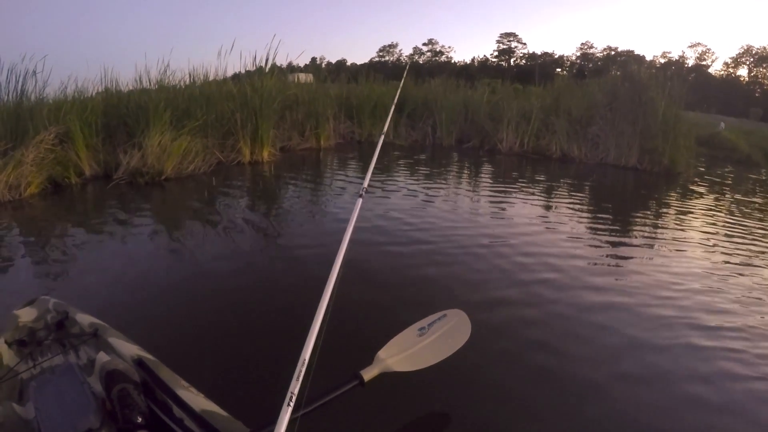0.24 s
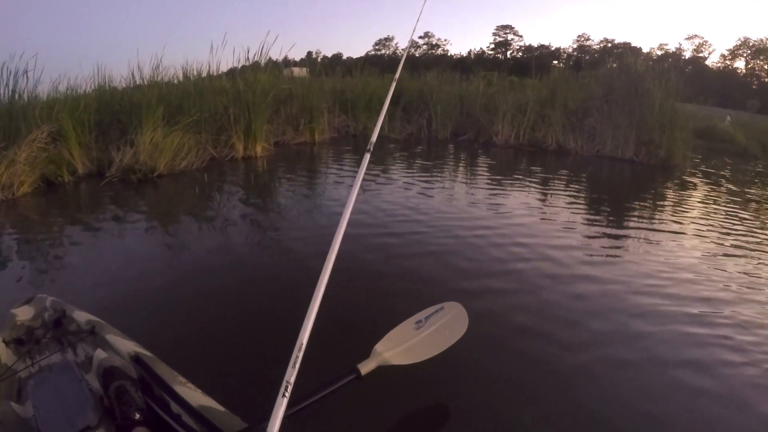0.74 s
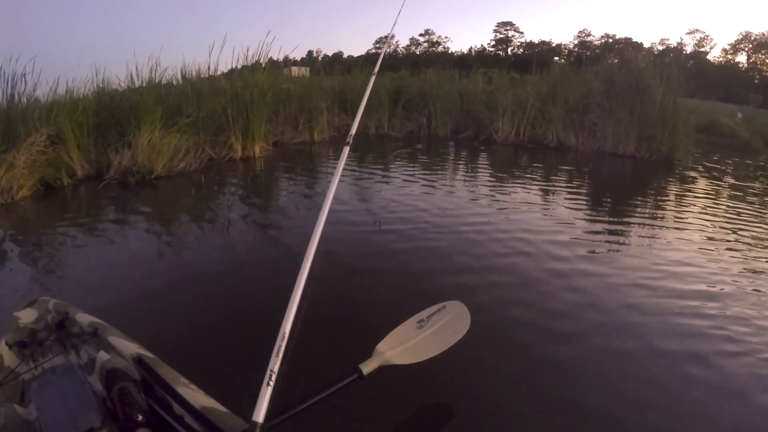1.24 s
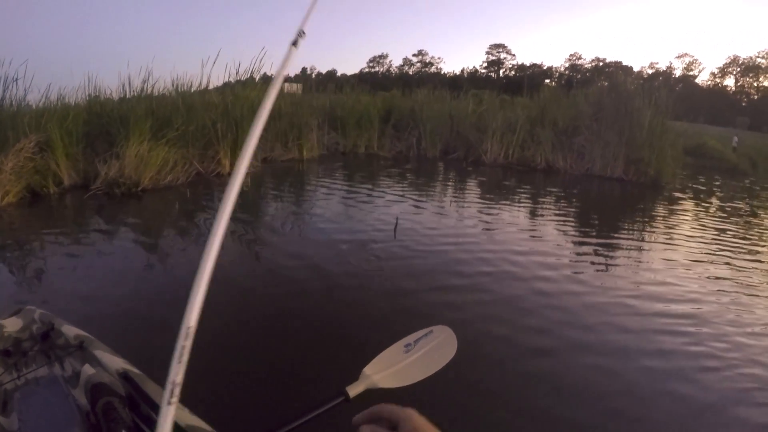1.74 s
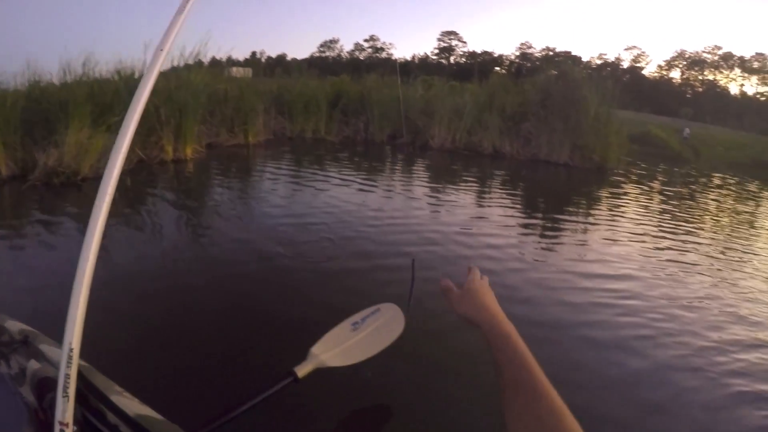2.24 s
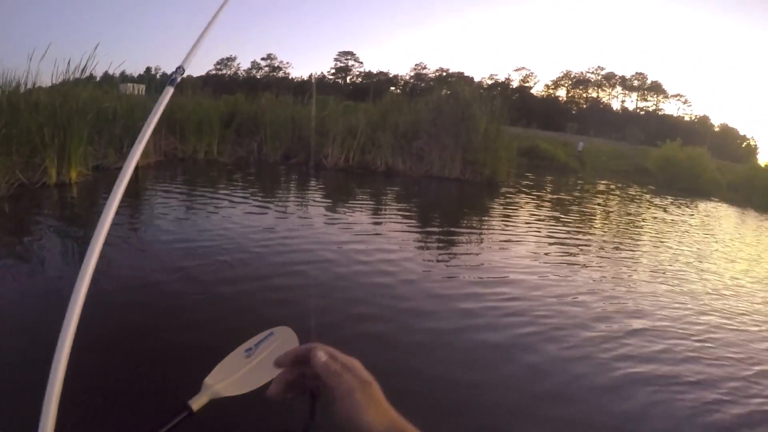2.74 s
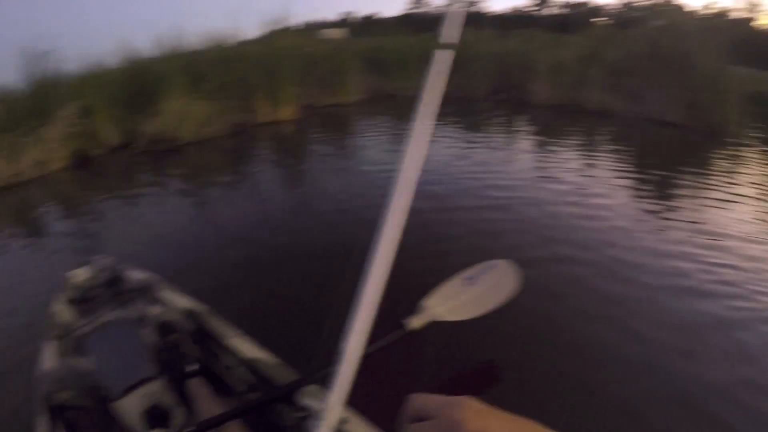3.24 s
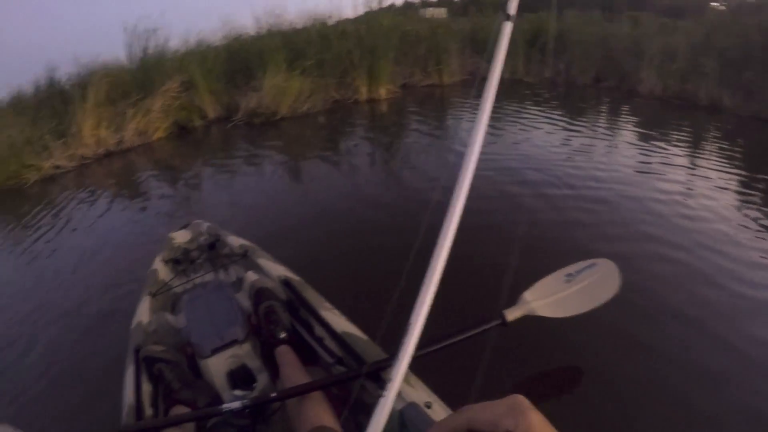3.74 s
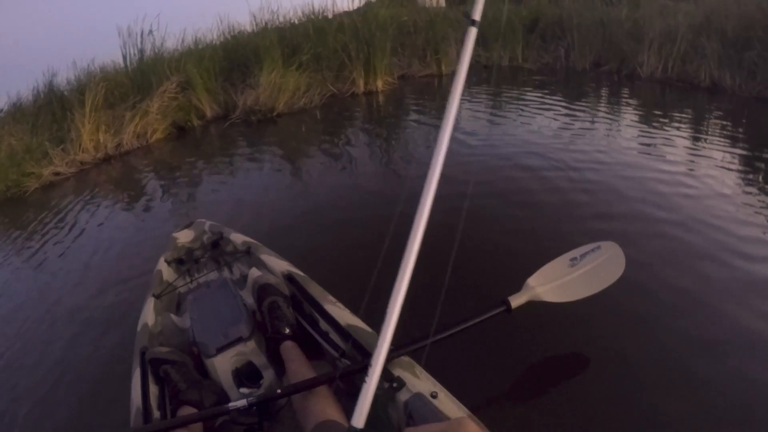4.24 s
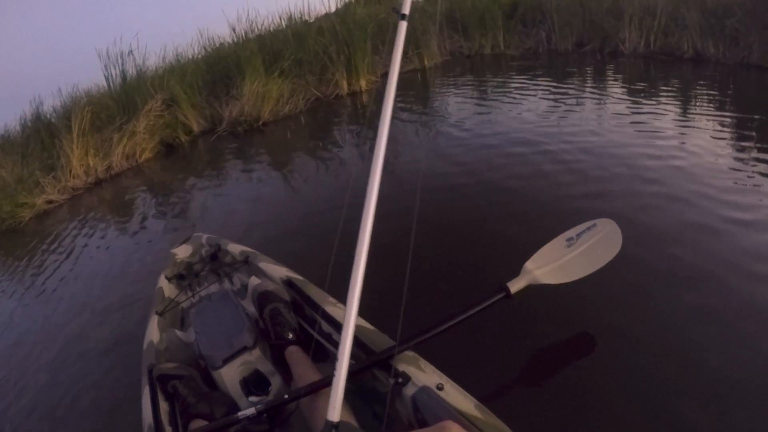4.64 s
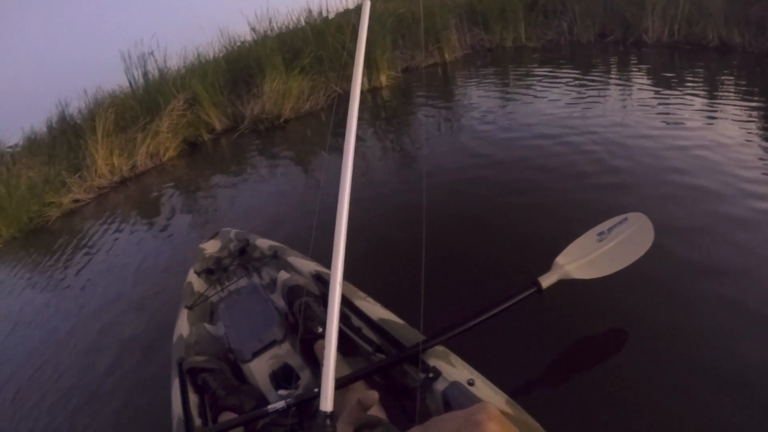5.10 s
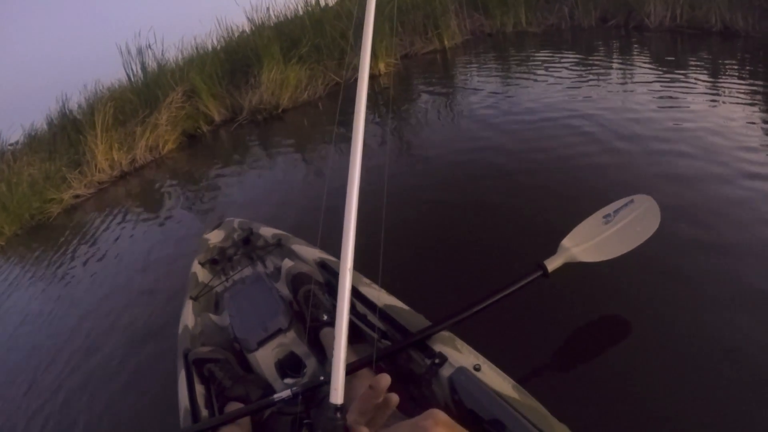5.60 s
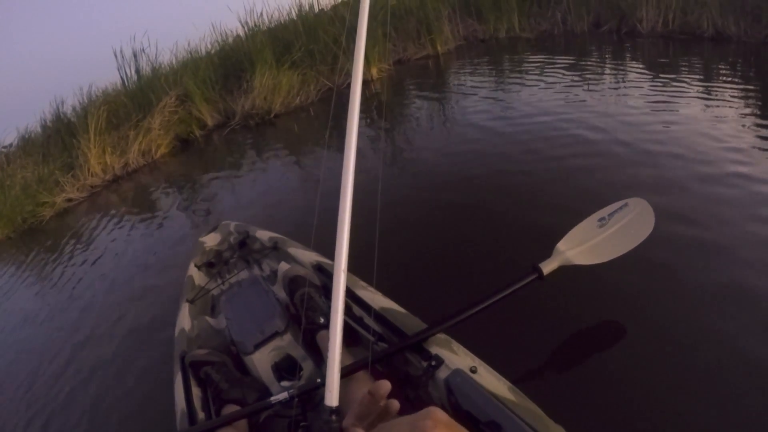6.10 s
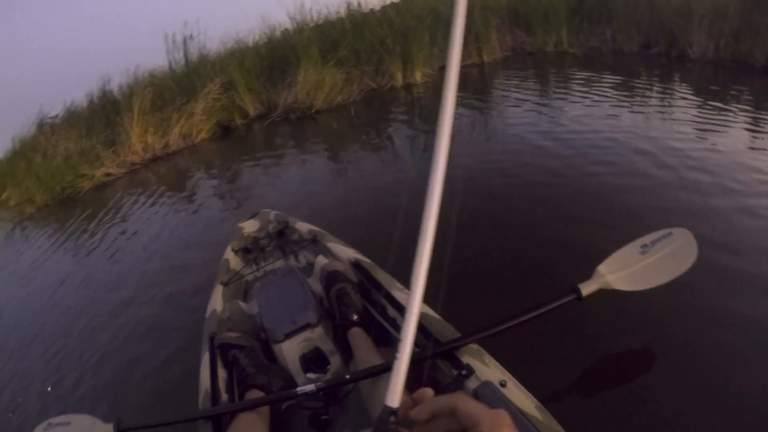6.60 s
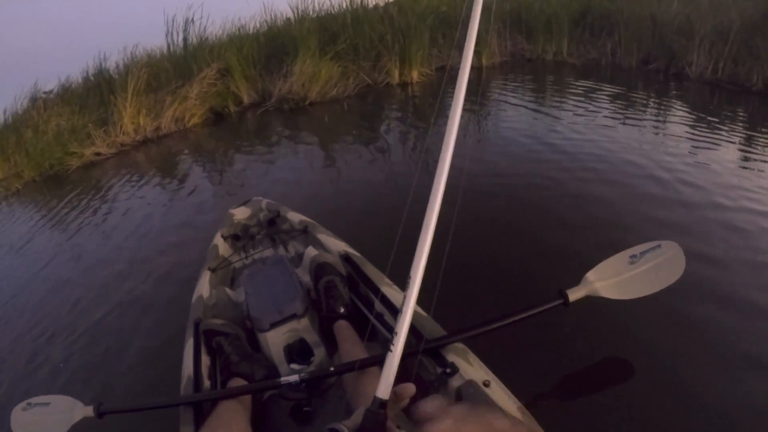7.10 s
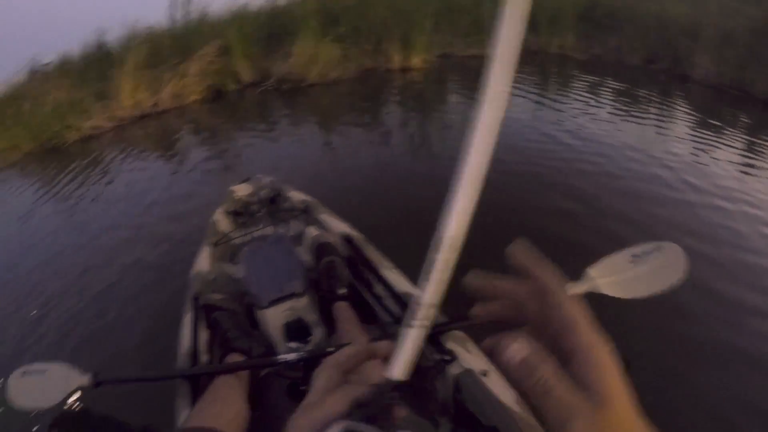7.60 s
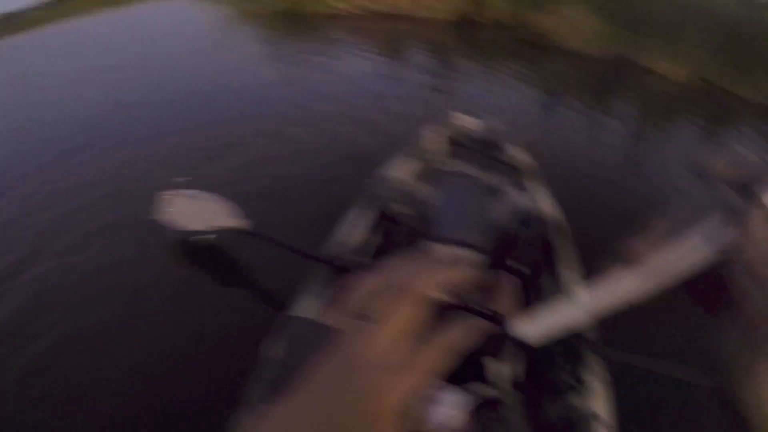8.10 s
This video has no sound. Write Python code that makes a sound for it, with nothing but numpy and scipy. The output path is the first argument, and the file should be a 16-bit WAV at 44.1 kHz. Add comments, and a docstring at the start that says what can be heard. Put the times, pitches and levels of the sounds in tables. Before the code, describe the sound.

Six rapid, fluttering bird buzzes fill the first half, alternating with tiny descending chips; later only chips and thin sliding whistles remain. A far, steady insect hum and open-air hush lie beneath, with deep soft gusts on the microphone. Small cloth rubs and dull hull knocks come from close by. A weak tackle click is followed much later by one bright, hard, dry snap, then brief rustling.

```python
"""Quiet marsh from a kayak at dusk

A bird repeats a buzzy trill (rapid pitch flicks); others chip, whistle and slur (gliding tones) from the reeds.
Behind them lie a thin, far insect drone (throbbing noise bands) and the hush of open air (shaped noise).
Light wind rumbles on the microphone (low noise following the breeze); the angler's clothes rustle in noise
grains, gear ticks on the hull, and the fishing tackle clicks twice, once sharply (ringing modes and a crack).
"""
import sys
import numpy as np
from scipy import signal
from scipy.fft import rfft, irfft
from scipy.io import wavfile
from scipy.ndimage import uniform_filter1d

SR = 44100
rng = np.random.default_rng(int(sys.argv[2]) if len(sys.argv) > 2 else 0)


def store_pcm(level_fs):
    """Save levels as 16-bit WAV."""
    pcm = np.round(np.clip(level_fs, -1, 1) * 32767).astype(np.int16)
    wavfile.write(sys.argv[1], SR, np.atleast_2d(pcm).T)


N = 368235
TIME = np.arange(N) / SR


def amp(db):
    """Decibels to gain."""
    return 10 ** (np.asarray(db) / 20)


def unit(x):
    """Scales to rms 1."""
    return x / np.sqrt(np.mean(x ** 2) + 1e-20)


def add(mix, s, sound):
    """Mixes a sound in at time s, trimming whatever falls outside the mix."""
    at = round(s * SR)
    sound = sound[max(-at, 0):]
    part = mix[max(at, 0):][:len(sound)]
    part += sound[:len(part)]


def colour(x, points):
    """Filters x through a curve of (f/Hz, level/dB) points and scales it to rms 1."""
    hz, db = np.transpose(points)
    f = np.fft.rfftfreq(len(x), 1 / SR)
    gain = amp(np.interp(np.log(f + 1), np.log(hz), db))
    return unit(irfft(rfft(x) * gain, len(x)))


def drift(size, rate):
    """Smooth random wander of rms 1; its spectrum rolls off around rate in Hz."""
    f = np.fft.rfftfreq(size, 1 / SR)
    spectrum = rfft(rng.standard_normal(size)) * np.exp(-(f / rate) ** 2)
    return unit(irfft(spectrum, size))


def course(length):
    """Runs from 0 to 1 over a length in seconds."""
    return np.linspace(0, 1, int(length * SR))


def phase(hz):
    """Running phase of a frequency curve."""
    return 2 * np.pi * np.cumsum(hz) / SR


def echo(x, delay, db):
    """Adds one late copy."""
    t = np.arange(len(x)) / SR
    return x + amp(db) * np.interp(t - delay, t, x, left=0)


def reeds(x, wet_db, t60):
    """The reed bank scatters a sound into many late copies that die away over t60 seconds."""
    t = np.arange(SR // 2) / SR
    sparse = rng.standard_normal(len(t)) * (rng.random(len(t)) < .1)
    taps = sparse * (t > .003) * amp(-60 * t / t60)
    scattered = signal.fftconvolve(x, taps / np.linalg.norm(taps))[:len(x)]
    return x + amp(wet_db) * scattered


# tone of the still air over the marsh: f/Hz, relative level per Hz/dB
AIR_COLOUR = [(30, 8.5), (120, 9.5), (220, 4.5), (400, -1), (800, -4.5), (1200, -6), (2800, -6.5),
              (4300, -8), (5800, -10), (6600, -13.5), (9500, -16.5), (15000, -20.5)]


def air(level_db=-61.5, swell_db=1.0):
    """The smooth hush of the open marsh: shaped noise with a small random swell."""
    return colour(rng.standard_normal(N), AIR_COLOUR) * amp(level_db + swell_db * drift(N, 5.5))


# strength of the breeze at the microphone: t/s, buffeting level/dB, flutter level before its trim/dB
BREEZE = [(0, -54, -60.5), (0.45, -56, -62.5), (1.0, -49, -57.5), (1.35, -52.5, -61), (1.65, -48.5, -57),
          (2.0, -55, -57), (2.55, -50, -56), (3.3, -45.5, -58.5), (3.65, -53.5, -57), (4.6, -54, -62),
          (5.05, -50.5, -58), (5.55, -47.5, -52), (6.3, -48.5, -52.5), (6.8, -55.5, -59.5), (7.2, -54, -58),
          (7.85, -50, -59), (8.35, -45, -50)]
# single gusts that thump the microphone: t/s, buffeting change/dB, flutter change/dB
GUSTS = [(.7, -1, 12.5), (1.01, -2, 13), (1.21, 9.5, 7), (1.58, -2, 12), (2.54, 12, -16), (3.19, 8.5, 6),
         (7.37, 8, 8.5), (7.88, 10.5, 1), (8.22, 3, -8)]
GUST_S = 0.042  # time from the peak of a gust to 1/e of its dB change


def eddies(shape, breeze_db, gusts_db, lumpy_db, lumps_per_s=6):
    """Turbulence of one size: it follows the breeze, jumps at each gust and is lumpy in between."""
    db = np.interp(TIME, np.transpose(BREEZE)[0], breeze_db) + lumpy_db * drift(N, lumps_per_s)
    for s, extra_db in zip(np.transpose(GUSTS)[0], gusts_db):
        db = db + extra_db * np.exp(-((TIME - s) / GUST_S) ** 2)
    swirl = colour(rng.standard_normal(N), shape)
    # even out the noise's own swells, so that the level follows the curve
    local_rms = np.sqrt(uniform_filter1d(swirl ** 2, size=6000))
    return swirl / local_rms * amp(db)


# tone of the deep buffeting: f/Hz, relative level per Hz/dB
BUFFET_COLOUR = [(8, -15), (20, -2), (30, 5), (48, -7.5), (62, -14), (120, -47), (1000, -120)]
# tone of the quicker flutter: f/Hz, relative level per Hz/dB
FLUTTER_COLOUR = [(35, -23.5), (58, 0.5), (76, -1), (100, -11), (140, -28.5), (250, -38.5), (600, -54),
                  (3000, -110)]


def wind(flutter_trim_db=0.56):
    """Large slow eddies and small quick ones hit the microphone."""
    _, deep, quick = np.transpose(BREEZE)
    _, deep_gusts, quick_gusts = np.transpose(GUSTS)
    buffeting = eddies(BUFFET_COLOUR, deep, deep_gusts, lumpy_db=2)
    flutter = eddies(FLUTTER_COLOUR, quick + flutter_trim_db, quick_gusts, lumpy_db=2)
    return buffeting + flutter


# insect choirs: centre f/Hz, width/Hz, level before the swell/dB, mean throb rate/Hz
INSECTS = [(5240, 238, -81, 59), (4868, 200, -83.5, 34)]
# common swell of the choirs: t/s, added level/dB
CHOIR_SWELL = [(0, 2), (1.2, 4), (2.5, 1), (4, 4), (5.3, 4.5), (6.5, 6.5), (7.4, 6), (8.35, 3)]


def insects(throb=0.299, swell_db=1):
    """Many far insects blur into narrow, faintly throbbing bands of noise."""
    out, f = np.zeros(N), np.fft.rfftfreq(N, 1 / SR)
    for hz, width, db, rate in INSECTS:
        bell = np.exp(-2 * ((f - hz) / width) ** 2)
        band = unit(irfft(rfft(rng.standard_normal(N)) * bell, N))
        pulse = 1 + throb * np.sin(phase(rate * (1 + 0.0676 * drift(N, 3.6))))
        out += band * pulse * amp(db + swell_db * drift(N, 12.0))
    return out * amp(np.interp(TIME, *np.transpose(CHOIR_SWELL)))


# course of a trill: share of its length, level change/dB, pitch factor, mean flick rate/Hz,
# height of the flicks as a share of the pitch
TRILL_SHAPE = [(0, 0, 1.07, 77, .19), (.1, -3.2, 1.015, 67, .28), (.4, -4.5, .985, 61, .31),
               (.78, -6, .972, 59, .3), (1, -12.5, .985, 57.4, .22)]
WATER_S = 0.002  # lag of the bounce off the water


def trill(length, db, hz, water_db, lowest=.54, sharp=1.55, waver=0.0131, unsteady=0.023,
          uneven_db=0.9, uneven_reach=.1, wander=0.00794, dip=0.42):
    """Some sixty tiny notes a second, each swooping down and up again; a bounce off the water colours them."""
    u = course(length)
    share, *columns = np.transpose(TRILL_SHAPE)
    level_db, bend, rate, sweep = (np.interp(u, share, c) for c in columns)
    cycle = (np.cumsum(rate * (1 + unsteady * drift(len(u), 23))) / SR) % 1
    # each flick bottoms out at the share "lowest" of its cycle
    flick = abs((cycle - lowest) / lowest) ** sharp * (1 + uneven_reach * drift(len(u), 58.0))
    unrest = waver * drift(len(u), 320) + wander * drift(len(u), 36.0)
    pitch = hz * bend * (1 + sweep * flick + unrest)
    level = amp(db + level_db + uneven_db * drift(len(u), 60)) * np.sin(np.pi * cycle) ** dip
    notes = level * np.sin(phase(pitch)) * signal.windows.tukey(len(u), .03) * np.sqrt(2)
    return echo(notes, WATER_S, water_db)


def chip_lead(db, length=0.009, start_hz=3200, top_hz=4570):
    """A soft, swelling upward sweep that leads into a chip."""
    u = course(length)
    tone = np.sin(phase(start_hz + (top_hz - start_hz) * u))
    return amp(db) * unit(tone * u * signal.windows.tukey(len(u), .3))


CHIP_HZ, CHIP_S = 4630, 0.0093  # mean mid-note pitch and length


def chip(db, sag=0.27, jitter=.035, scatter=0.0115, overtone_db=-20, near_db=0, near_t60=0.069):
    """A very short note that whips down; the stems around the bird scatter it at once."""
    u = course(CHIP_S)
    pitch = CHIP_HZ * (1 - sag * (u - .5) + jitter * drift(len(u), 800))
    turn = phase(pitch * (1 + scatter * rng.standard_normal()))
    # partials an octave and a fifth above
    note = np.sin(turn) + amp(overtone_db) * (np.sin(2 * turn) / 2 + np.sin(3 * turn / 2))
    note = amp(db) * unit(note * signal.windows.tukey(len(u), .4))
    return reeds(np.pad(note, (0, SR // 10)), near_db, near_t60)


def whistle(length, db, hz, glide, hoarse, arch=0.06, flutter_db=2.0):
    """A soft, slightly arched note from far away that glides, flutters and fades."""
    u = course(length)
    pitch = hz * (1 + glide * (u - .5) - arch * (u - .5) ** 2 + hoarse * drift(len(u), 300))
    fade = signal.windows.tukey(len(u), .75)
    return amp(db) * unit(np.sin(phase(pitch)) * fade * amp(flutter_db * drift(len(u), 70)))


# mean course of a slur: t/s, f/Hz, relative level/dB
SLUR_SHAPE = [(0, 4220, -1), (.008, 4620, -10), (.017, 4400, -0.5), (.028, 4020, -1), (.04, 3750, -7.5),
              (.053, 3650, -5), (.063, 3330, -12)]
SLUR_HOOK_S = 0.031  # the level change of the opening hook fades out over this time


def slur(db, hook_db, waver=.012, flutter_db=3, scatter=0.00765):
    """A thin whistle that hooks upward, slides down, levels off and drops away."""
    s, hz, level_db = np.transpose(SLUR_SHAPE)
    t = course(s[-1]) * s[-1]
    pitch = np.interp(t, s, hz) * (1 + scatter * rng.standard_normal() + waver * drift(len(t), 200))
    hook = np.interp(t, [0, SLUR_HOOK_S], [hook_db, 0])
    level = amp(np.interp(t, s, level_db) + hook + flutter_db * drift(len(t), 120))
    return amp(db) * unit(np.sin(phase(pitch)) * level * signal.windows.tukey(len(t), .12))


# All bird levels are taken before the reeds add their scatter.
# buzzy trills: t/s, length/s, level at the start/dB, base f/Hz, bounce off the water/dB
TRILLS = [(-.075, .465, -58, 2540, -4.5), (0.784, 0.488, -59.5, 2510, -4), (1.61, .43, -59, 2538, -6),
          (2.488, 0.48, -55, 2530, -9), (3.299, .41, -60.5, 2518, -7.5), (4.066, 0.38, -59.5, 2490, -8)]
# sharp chips: t/s, level/dB
CHIPS = [(.688, -56.5), (1.207, -53), (1.813, -68), (2.262, -52.5), (2.938, -51.5), (3.625, -50),
         (4.806, -67), (5.245, -53), (6.407, -53.5), (6.798, -52.5)]
# far whistles: t/s, length/s, level/dB, f/Hz, glide and hoarseness as shares of the pitch
WHISTLES = [(0.759, 0.087, -71, 2298, 0.024, .005), (0.9, 0.0363, -71.5, 1560, -0.039, .005),
            (1.095, 0.05, -72.5, 1820, -0.0015, .005), (1.143, 0.082, -66, 4450, .12, .06),
            (1.659, 0.0346, -70, 4047, 0.045, .035), (1.72, 0.17, -69, 1708, -0.022, .005),
            (2.028, 0.051, -71, 2680, -0.1, .01), (2.658, 0.0484, -72, 3920, -0.069, .015),
            (2.665, 0.099, -71.5, 2202, -0.0337, .012), (4.031, .05, -72, 4020, -.06, .01),
            (6.939, 0.14, -73, 1803, -0.012, .005)]
# falling slurs: t/s, level/dB, level change of the opening hook/dB
SLURS = [(1.815, -75, -6), (2.095, -70.5, -15), (2.335, -72, -20), (3.118, -70, -20), (3.228, -74.5, 0),
         (3.55, -72, -18), (4.612, -71.5, -8), (5.06, -72.5, -12), (5.431, -65, 0), (5.928, -62, 1),
         (6.494, -64, -3), (7.552, -63.5, -1), (7.907, -68, 7)]


def birds(lead_s=0.009, lead_db=-16):
    """Each kind of call has its own amount and length of scatter from the reeds."""
    trills, chips, slurs, far = np.zeros((4, N))
    for mix, voice, table in ((trills, trill, TRILLS), (chips, chip, CHIPS),
                              (slurs, slur, SLURS), (far, whistle, WHISTLES)):
        for s, *row in table:
            add(mix, s, voice(*row))
    for s, db in CHIPS:
        add(chips, s - lead_s, chip_lead(db + lead_db))
    return (reeds(trills, wet_db=-10, t60=0.12) + reeds(chips, wet_db=-7, t60=0.27)
            + reeds(slurs, wet_db=-10, t60=0.2) + reeds(far, wet_db=-9.5, t60=.28))


# arm movements that rub the clothes: t/s, length/s, level at the middle of the stroke/dB
RUBS = [(2.509, 0.17, -61), (2.686, .149, -66), (3.035, 0.26, -62.5), (4.952, 0.56, -64.5),
        (6.442, .125, -65.5), (7.691, 0.15, -65), (7.81, 0.082, -58.5), (7.914, 0.062, -58),
        (8.02, 0.36, -70)]
# tone of the cloth: f/Hz, relative level/dB
CLOTH_COLOUR = [(150, -38.5), (380, -4), (560, 6), (900, 5), (1300, -11), (2100, -4), (3200, -26),
                (8000, -27), (15000, -53.5)]


def clothes(grain_db=2.5, grains_per_s=1300, clump_db=2, clumps_per_s=60):
    """Cloth slips in clumps of tiny grains under each arm movement."""
    stroke = np.zeros(N)
    for s, length, db in RUBS:
        add(stroke, s, amp(db) * np.sin(np.pi * course(length)))
    grain_level = amp(grain_db * np.minimum(rng.exponential(1, N), 3))
    slips = rng.standard_normal(N) * grain_level * (rng.random(N) < grains_per_s / SR)
    return stroke * colour(slips * amp(clump_db * drift(N, clumps_per_s)), CLOTH_COLOUR)


# ticks of gear on the hull: t/s, level before the decay/dB
TICKS = [(2.555, -53), (3.118, -48.5), (5.018, -56), (5.199, -47.5), (5.221, -61), (5.301, -59),
         (5.398, -53), (7.82, -58), (7.858, -49), (7.923, -49), (7.952, -43), (8.073, -53.5)]
# tone of a tick: f/Hz, relative level/dB
KNOCK_COLOUR = [(150, 6), (500, -0.5), (900, 5), (1300, -7), (2100, 1), (3200, -23.5), (8000, -29)]


def hull_ticks(t60=0.025):
    """Gear ticks dully on the hull: short decaying bursts of shaped noise."""
    ticks = np.zeros(N)
    t = np.arange(2048) / SR
    for s, db in TICKS:
        add(ticks, s, amp(db - 60 * t / t60) * colour(rng.standard_normal(len(t)), KNOCK_COLOUR))
    return ticks


# ring of the tackle: f/Hz, level before the tilt/dB, t60/s
TACKLE_MODES = [(1520, -22, 0.074), (1883, -23, 0.051), (3057, -11.5, 0.021), (4038, -2, 0.01714),
                (4180, -5.5, 0.02), (4365, -3, 0.0112), (5050, -5.5, 0.0203), (5350, -14.5, 0.0126),
                (6070, -19, 0.018), (6570, -23, 0.0217), (7640, -1, 0.012), (8100, -9, 0.013),
                (9460, -5.5, 0.00635), (10200, -12, 0.0082), (11100, -25.5, 0.0074)]
# tone of the crack before the tilt: f/Hz, relative level/dB
CRACK_COLOUR = [(200, -34), (500, 3), (950, -13), (1400, 0), (3000, 9.5), (4500, 7.5), (6300, 5.5),
                (9300, -11.5), (12000, 4), (15000, -3)]


def contact(s, db, tilt_db, crack_db, crack_t60=0.0179, rise=0.00048, crack_tilt=0.29):
    """One hard touch at time s: a crack and a push to the ring of the stiff parts, both brighter with tilt."""
    t = np.arange(4096) / SR
    ring = sum(amp(mode_db + tilt_db * np.log2(hz / 5000) - 60 * t / t60) * np.sin(2 * np.pi * hz * (t + s))
               for hz, mode_db, t60 in TACKLE_MODES)
    shape = [(hz, level + crack_tilt * tilt_db * max(np.log2(hz / 5000), 0)) for hz, level in CRACK_COLOUR]
    crack = amp(crack_db - 60 * t / crack_t60) * colour(rng.standard_normal(len(t)), shape)
    return s, amp(db) * (ring + crack) * (1 - np.exp(-t / rise)) / 2


# tackle clicks: t/s, relative level/dB, treble tilt/dB per octave, crack gain/dB,
# gap to the second contact/s, delay of the bounce/s, bounce level against the snap/dB
CLICKS = [(2.794, -32, 3, 7, 0.00056, 0.0055, -14), (7.243, -11, 7.5, -6, 0.00139, 0.013, -22)]
TOUCH_S, TOUCH_DB = .0167, -24.5  # light touch: time ahead of the snap, level against it
SLIP_S, SLIP_DB = 0.0019, -21  # slip just before the snap
SECOND_DB, DULLING_DB = -2.5, -2  # second contact's level; tilt lost per later contact, dB an octave
BACK_HZ, BACK_WIDTH_HZ = 5120, 1050  # the band that the reeds send back


def tackle():
    """A catch is touched, slips, snaps over in two quick contacts and bounces once."""
    out = np.zeros(N)
    for s, db, tilt_db, crack_db, second_s, bounce_s, bounce_db in CLICKS:
        for early, softer_db in (TOUCH_S, TOUCH_DB), (SLIP_S, SLIP_DB):
            add(out, *contact(s - early, db + softer_db, 0, crack_db))
        snaps = [(0, 0), (second_s, SECOND_DB), (bounce_s, bounce_db)]
        for k, (delay, softer_db) in enumerate(snaps):
            add(out, *contact(s + delay, db + softer_db, tilt_db + k * DULLING_DB, crack_db))
    # the reeds send back only a faint, thin copy, 38 ms late
    back = signal.lfilter(*signal.iirpeak(BACK_HZ, BACK_HZ / BACK_WIDTH_HZ, fs=SR), out)
    scattered = reeds(back, wet_db=6.5, t60=0.36)
    return out + amp(-32.5) * np.interp(TIME - .038, TIME, scattered, left=0)


def scene():
    """Everything at one microphone."""
    return (air() + wind() + insects() + birds() + clothes() + hull_ticks() + tackle())[None]


def record(dry, edge_hz=15350):
    """Band limit: a steep low-pass takes off the extreme treble."""
    lowpass = signal.firwin(511, edge_hz, window=("kaiser", 9), fs=SR)
    return signal.oaconvolve(dry, lowpass[None], "same", axes=1)


dry = scene()
out = record(dry)
store_pcm(out)
```